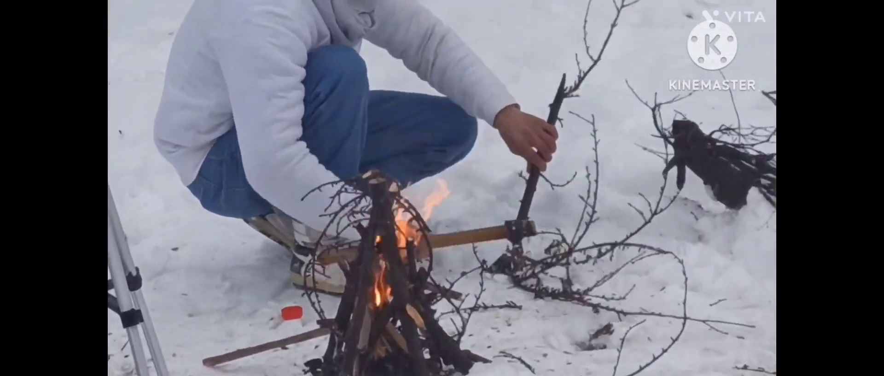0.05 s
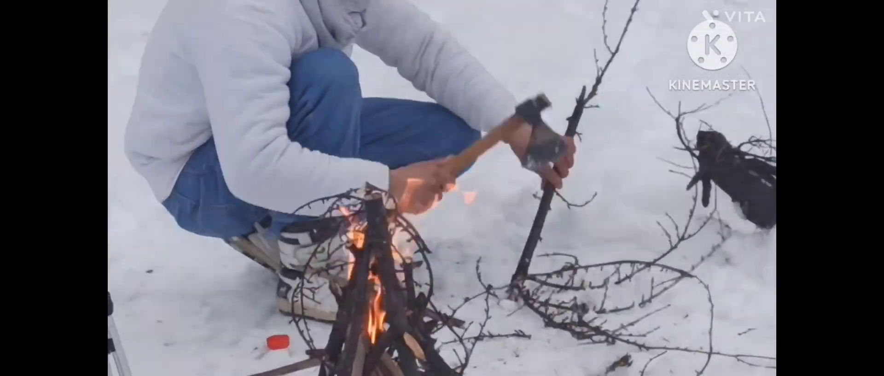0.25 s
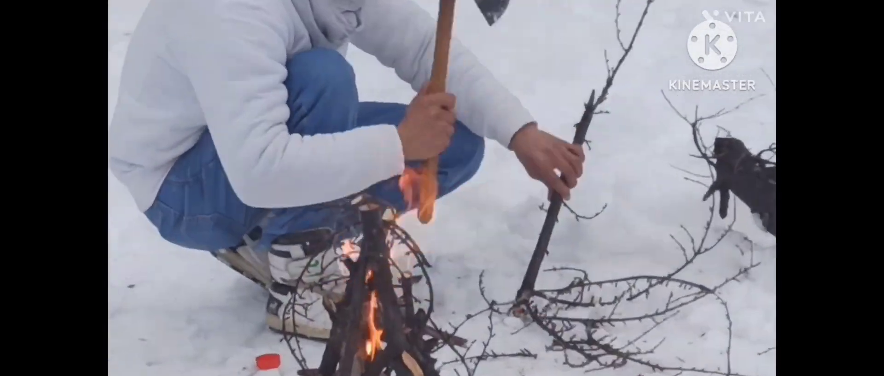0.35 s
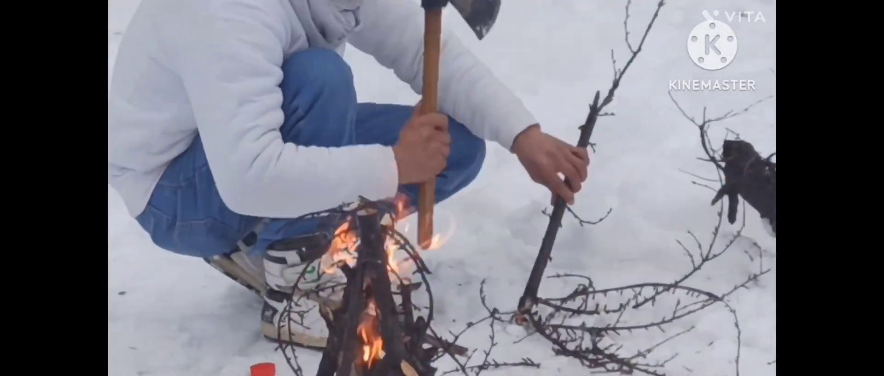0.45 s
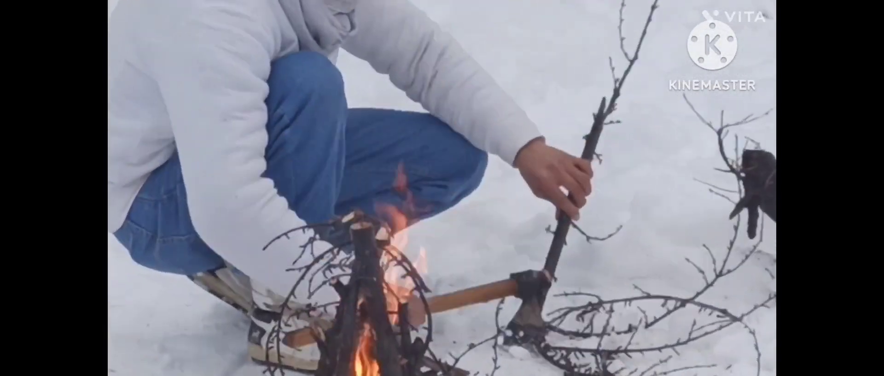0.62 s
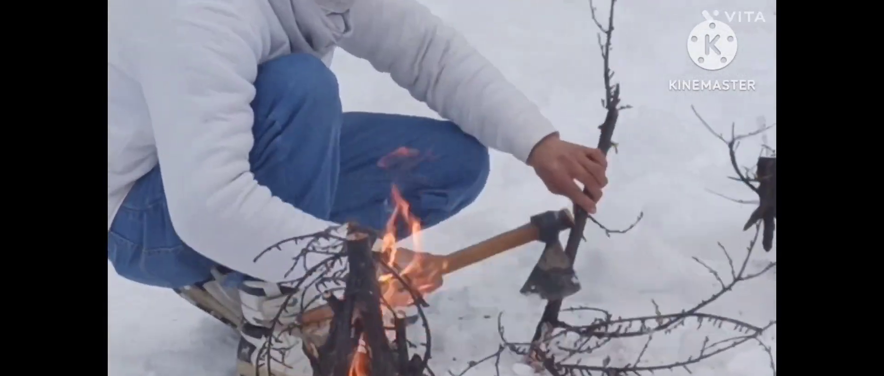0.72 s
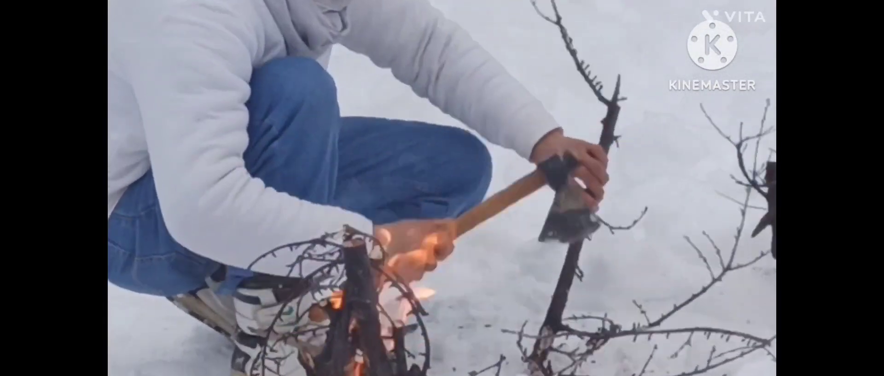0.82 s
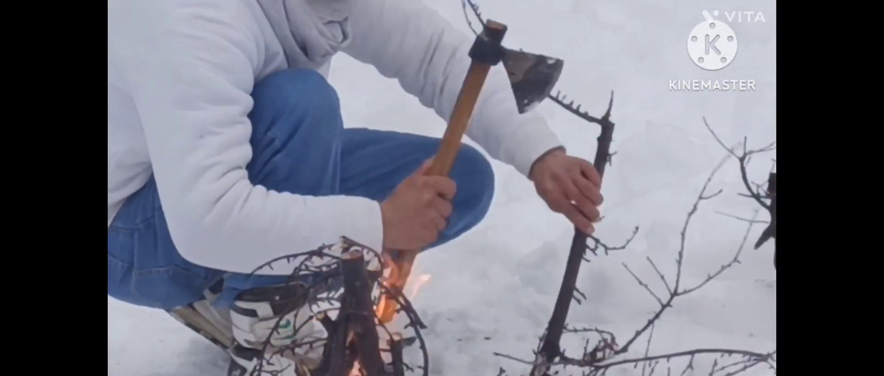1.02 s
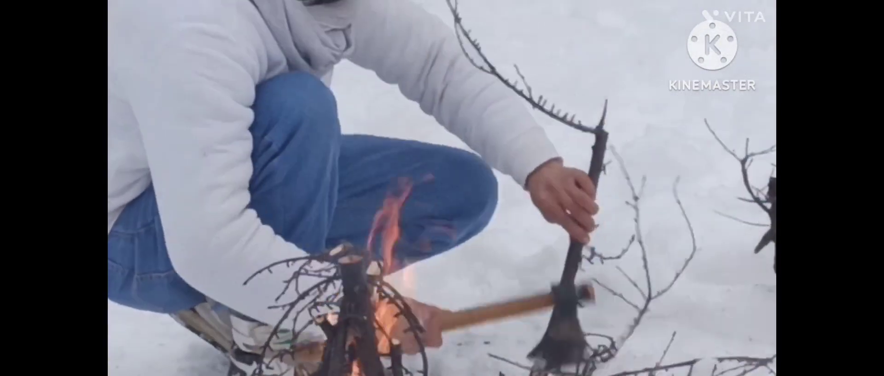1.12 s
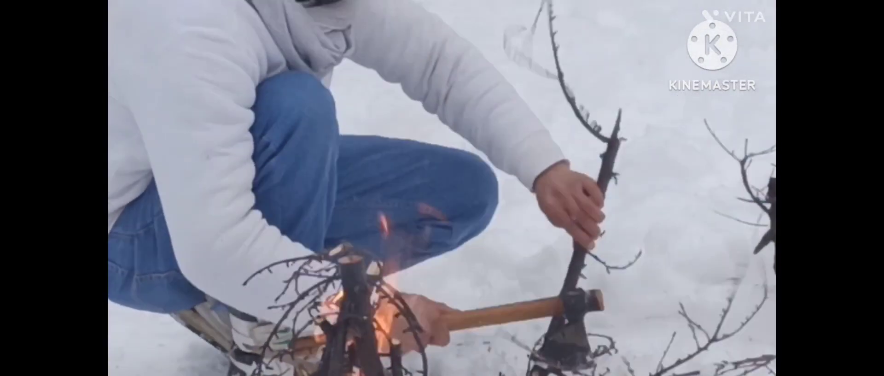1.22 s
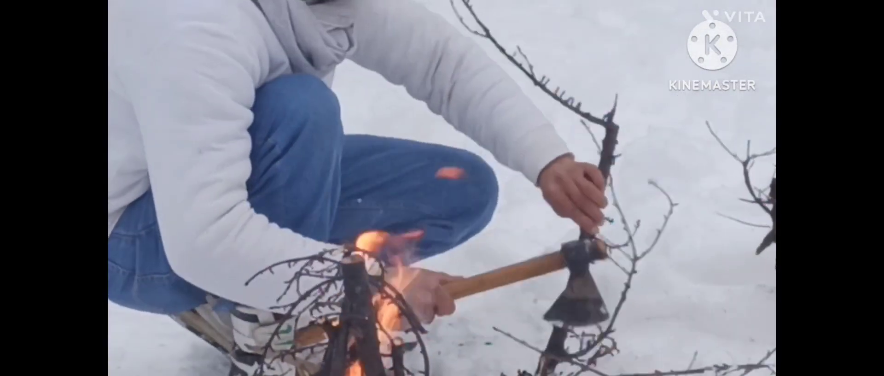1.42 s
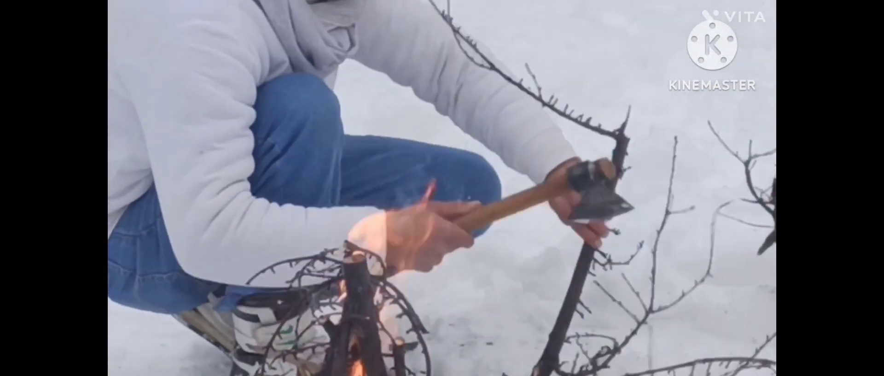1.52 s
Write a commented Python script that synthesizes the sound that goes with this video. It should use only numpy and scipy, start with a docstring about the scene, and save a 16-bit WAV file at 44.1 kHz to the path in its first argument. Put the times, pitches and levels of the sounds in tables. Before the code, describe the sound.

Three short, dry hatchet blows on thin wood, two strong and one weak, with a twig rustle after the first, over soft outdoor noise and a faint low hum, picked up close by a small microphone.

```python
"""A hatchet chops three times into a thin branch held upright on snow; the last blow is a light tap.
At each blow the edge bites (noise bursts), fibres crunch (grainy noise) and snap (damped modes),
while the branch thumps and knocks and the steel rings briefly (damped modes), with a weak late echo.
After the first blow twigs swish (moving narrow noise); twigs tick (noise bursts) then and around the last blow.
A faint hum (fuzzy tones) and soft outdoor noise run throughout, all through a small microphone."""
import sys
import numpy as np
from scipy import signal
from scipy.fft import rfft, irfft, next_fast_len
from scipy.io import wavfile
from scipy.ndimage import map_coordinates

SR = 44100
rng = np.random.default_rng(int(sys.argv[2]) if len(sys.argv) > 2 else 0)


def log_audio(samples):
    """Write samples as a 16-bit WAV file to the path given in sys.argv[1]."""
    # one column per channel
    frames = np.atleast_2d(samples).T
    # limit to full scale, then quantise
    limited = np.clip(frames, -1, 1)
    pcm = np.round(limited * 32767).astype(np.int16)
    wavfile.write(sys.argv[1], SR, pcm)


N = 68355
T = np.arange(N) / SR  # s


def amp(db):
    """Decibels to gain."""
    return 10 ** (np.asarray(db) / 20)


def unit(x):
    """Scale to rms 1."""
    return x / np.sqrt(np.mean(x ** 2) + 1e-20)


def gains(points, hz):
    """Gain read between (Hz, dB) points on a log frequency axis."""
    point_hz, point_db = np.transpose(points)
    return amp(np.interp(np.log(hz + 1), np.log(point_hz + 1), point_db))


def filtered(x, response):
    """Shape the spectrum of x by a gain that is a function of frequency."""
    size = next_fast_len(N + SR // 2)  # padded, so the end does not wrap round
    spectrum = rfft(x, size) * response(np.fft.rfftfreq(size, 1 / SR))
    return irfft(spectrum, size)[:N]


def low_cut(x, hz, order):
    """Causal high-pass."""
    return signal.sosfilt(signal.butter(order, hz, "high", fs=SR, output="sos"), x)


def noise(spectrum):
    """Coloured noise of rms 1."""
    return unit(filtered(rng.standard_normal(N), lambda hz: gains(spectrum, hz)))


def wobble(rate):
    """A smooth random curve of rms 1, rate knots a second."""
    knots = rng.standard_normal(int(N * rate / SR) + 4)
    return unit(map_coordinates(knots, [T * rate]))


def narrow(hz, width_hz):
    """A fuzzy tone of rms 1 around a steady or moving frequency."""
    phase = 2 * np.pi * np.cumsum(hz * np.ones(N)) / SR
    in_phase = wobble(2 * width_hz) * np.cos(phase)
    quadrature = wobble(2 * width_hz) * np.sin(phase)
    return unit(in_phase + quadrature)


def fade(t, t60):
    """Exponential decay from t = 0, by 60 dB in t60 seconds."""
    return (t >= 0) * np.exp(-np.log(1000) * np.abs(t) / t60)


RING_ROUGH_RATE = 500  # knots a second in the phase of a rough ring


def ring(modes, start_s, rise_s, rough_rad=0):
    """Damped modes with a soft onset and optional phase roughness; the first swing is negative."""
    t = np.maximum(T - start_s, 0)
    total = np.zeros(N)
    for pitch_hz, level_db, t60_s in modes:
        phase = 2 * np.pi * pitch_hz * t + rough_rad * wobble(RING_ROUGH_RATE)
        total += amp(level_db) * fade(t, t60_s) * np.sin(phase)
    return -(1 - np.exp(-t / rise_s)) * total


def clack(modes, start_s, rise_s):
    """Short wood modes of alternating sign, which merge into one broad knock."""
    return sum(-(-1) ** k * ring([mode], start_s, rise_s) for k, mode in enumerate(modes))


# The edge enters the bark: start_s, level_db
BITES = [(0.2054, -39.5), (0.8279, -38.5), (1.385, -56), (1.4035, -54)]
# Colour of the bite: pitch_hz, level_db (relative)
BITE = [(120, -22), (300, -8.5), (750, 4), (1300, -16), (2400, -7.5), (3200, -21), (5000, -18),
        (6600, -12.5), (9000, -25), (14000, -22)]
BITE_T60 = 0.031  # s


def bites():
    """The edge enters the bark with short bursts of coloured noise."""
    return noise(BITE) * sum(amp(level_db) * fade(T - start_s, BITE_T60) for start_s, level_db in BITES)


# The blade drives home: start_s, crunch_db, snap_db, thump_db, knock_db, steel_db,
# steel_lead_s, freedom (no unit; 1 = the blade rings freely)
CHOPS = [(.2134, -25.5, -14, -13.5, -29, -40, .005, 0.55),
         (0.8393, -31, -24.5, -15.5, -28.5, -25, .005, 0.93),
         (1.406, -48.5, -59, -27, -36, -39, 0.0027, 0.44)]
# Colour of the crunching fibres: pitch_hz, level_db (relative)
CRUNCH = [(100, -2), (400, 4.5), (800, -0.5), (1250, -5), (1550, -2.5), (2200, -8), (2600, 2.5),
          (2850, -16), (3300, -3), (3700, -16), (4600, -4.5), (5050, -17), (5400, -6.5), (5800, -12),
          (6500, -9), (7300, -7), (8200, -4.5), (14000, -18)]
CRUNCH_RISE_T60, CRUNCH_T60 = 0.014, 0.015  # s per 60 dB, swelling and dying away
SPLINTER_DB, SPLINTER_T60 = -19, 0.056  # fibres that go on tearing: dB below the crunch, s


def crunch():
    """Fibres crunch ever louder as the edge sinks in, then die away while some go on tearing."""
    level = np.zeros(N)
    for start_s, crunch_db, *_ in CHOPS:
        t = T - start_s
        swell = fade(-t, CRUNCH_RISE_T60) * (t < 0)
        splinter = amp(SPLINTER_DB) * fade(t, SPLINTER_T60)
        level += amp(crunch_db) * (swell + fade(t, CRUNCH_T60) + splinter)
    return level * noise(CRUNCH)


# A breaking bundle of fibres: pitch_hz, level_db (relative), t60_s
SNAP = [(5410, -9, 0.011), (6456, -0.5, 0.006), (7100, -3, 0.0041), (13400, -15, 0.0048)]
SNAP_LEAD_S, SNAP_RISE_S = 0.000616, 0.0007


def snap():
    """A bundle of fibres breaks just before the blade drives home, as a cluster of very short modes."""
    out = np.zeros(N)
    for start_s, _, snap_db, *_ in CHOPS:
        out += amp(snap_db) * clack(SNAP, start_s - SNAP_LEAD_S, SNAP_RISE_S)
    return out


def fibres():
    """Bite and crunch share one random grain of loudness; the snaps stay clean."""
    grain = unit(amp(2.0 * wobble(1500)))
    return grain * (bites() + crunch()) + snap()


# Branch on the ground: pitch_hz, level_db (relative), t60_s
THUMP = [(212.4, -0.5, 0.028), (196.8, -20.5, 0.098), (136.3, -27, 0.16)]
# The wood itself: pitch_hz, level_db (relative), t60_s
KNOCK = [(390, -3, .026), (520, -3, 0.018), (631, 0.5, 0.025)]
THUMP_RISE_S, KNOCK_RISE_S, KNOCK_LEAD_S = 0.0028, 0.00071, 0.001


def branch():
    """Each blow thumps the branch on the ground in low modes and knocks the wood in higher ones."""
    out = np.zeros(N)
    for start_s, _, _, thump_db, knock_db, *_ in CHOPS:
        out += amp(thump_db) * ring(THUMP, start_s, THUMP_RISE_S)
        out += amp(knock_db) * clack(KNOCK, start_s - KNOCK_LEAD_S, KNOCK_RISE_S)
    return out


# The blade when it rings freely: pitch_hz, level_db (relative), t60_s
STEEL = [(2260, -20, 0.024), (2461, 1.5, 0.047), (2630, -17, 0.0396), (4700, -0.5, 0.055),
         (6450, -16.5, 0.052)]
STEEL_RISE_S = 0.0029
STEEL_ROUGH_RAD = 0.22  # rubbing wood unsettles the steel's phase
DULL_DB = 29  # per octave above the lowest mode: a fully gripped blade loses its upper modes


def blade():
    """The steel rings just ahead of each blow's main hit; a gripped blade rings short and dull."""
    out = np.zeros(N)
    lowest_hz = STEEL[0][0]
    for start_s, _, _, _, _, steel_db, steel_lead_s, freedom in CHOPS:
        gripped = []
        for pitch_hz, level_db, t60_s in STEEL:
            loss_db = DULL_DB * (1 - freedom) * np.log2(pitch_hz / lowest_hz)
            gripped.append((pitch_hz, level_db - loss_db, t60_s * freedom))
        out += amp(steel_db) * ring(gripped, start_s - steel_lead_s, STEEL_RISE_S, STEEL_ROUGH_RAD)
    return out


# Colour of the echo: pitch_hz, level_db (relative)
ECHO = [(150, -4.5), (600, 5), (1200, -4), (2000, -1.5), (3000, -9), (4500, -6), (6000, -9), (12000, -39)]
ECHO_DB, ECHO_DELAY_S, ECHO_T60 = -32, 0.06, 1.65  # scattered back from far around


def echo(blows):
    """The surroundings scatter each blow's energy back as a weak, late wash of noise."""
    tail = fade(T - ECHO_DELAY_S, ECHO_T60) ** 2  # squared, as it spreads energy
    energy = np.abs(signal.fftconvolve(blows ** 2, tail / tail.sum())[:N])
    return amp(ECHO_DB) * np.sqrt(energy) * noise(ECHO)


# Shaken twigs swish: start_s, length_s, start_hz, end_hz, width_hz, level_db
SWISHES = [(.222, .07, 3900, 4800, 900, -66), (.334, .022, 3520, 3420, 260, -62.5),
           (.347, .06, 4300, 4000, 900, -66.5), (.29, .09, 5900, 10000, 1400, -70),
           (.23, .24, 4000, 4200, 1300, -74)]
SWISH_FLUTTER_DB = 2  # rms


def swishes():
    """Shaken side twigs swish after the first blow, as fluttering narrow noise that glides in pitch."""
    out = np.zeros(N)
    for start_s, length_s, start_hz, end_hz, width_hz, level_db in SWISHES:
        progress = np.clip((T - start_s) / length_s, 0, 1)
        swell = np.sin(np.pi * np.sqrt(progress))  # quick rise, slower fall
        flutter = amp(level_db + SWISH_FLUTTER_DB * wobble(200))
        out += flutter * swell * narrow(start_hz + (end_hz - start_hz) * progress, width_hz)
    return out


# Small twig ticks: start_s, level_db
TICKS = [(.262, -61.5), (0.286, -62), (1.271, -58), (1.413, -58), (1.428, -67), (1.4917, -61.5)]
# Colour of a tick: pitch_hz, level_db (relative)
TICK = [(300, 4), (2000, -2), (4000, -3), (7000, 0.5), (14000, -8)]
TICK_T60 = 0.03  # s


def ticks():
    """Small twigs tick now and then, as short bursts of noise."""
    return noise(TICK) * sum(amp(level_db) * fade(T - start_s, TICK_T60) for start_s, level_db in TICKS)


# Far hum: pitch_hz, level_db
HUM = [(59, -74), (116, -70), (204, -80.5)]
HUM_WIDTH_HZ = 2.5


def hum():
    """A wavering far hum of slightly fuzzy low tones."""
    return sum(amp(level_db) * narrow(pitch_hz, HUM_WIDTH_HZ) for pitch_hz, level_db in HUM)


# Colour of the open air: pitch_hz, level_db (relative, per Hz)
AIR = [(25, -18), (42, -15), (60, -3), (120, 1), (220, 3), (320, -4.5), (500, -4), (1000, -11.5),
       (2000, -16.5), (3200, -20.5), (4600, -18.5), (5500, -32), (7400, -20), (9000, -18.5), (12500, -24),
       (15500, -23.5)]
AIR_DB, AIR_DRIFT_DB = -63.5, 1.42  # level, rms drift around it


def air():
    """Soft outdoor noise whose level drifts at random."""
    return amp(AIR_DB + AIR_DRIFT_DB * wobble(13)) * noise(AIR)


RADIATE_HZ = 84  # low cut of the thin branch


def scene():
    """The thin branch radiates little bass; its blows arrive nearly dry."""
    blows = low_cut(fibres() + branch() + blade(), RADIATE_HZ, order=2)
    twigs = swishes() + ticks()
    return (blows + echo(blows) + twigs + hum() + air())[None]


# Response of the small microphone: pitch_hz, level_db
MICROPHONE = [(5000, -0.5), (5800, 0), (6500, 8), (7500, 4.5), (8300, -10.5), (9200, -21.5), (11200, -18),
              (12100, -4), (14000, -0.5), (15400, -6.5)]
LOW_CUT_HZ, TOP_HZ = 48, 15750


def record(dry):
    """The small microphone has a low cut, a bright peak, a notch above it and a band limit."""
    return filtered(low_cut(dry[0], LOW_CUT_HZ, order=6),
                    lambda hz: gains(MICROPHONE, hz) * (hz < TOP_HZ))[None]


dry = scene()
out = record(dry)
log_audio(out)
```